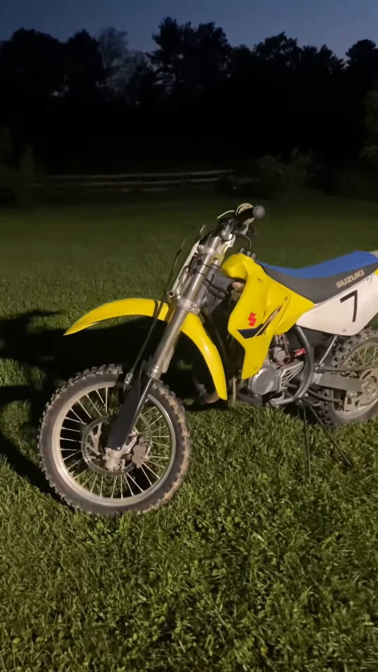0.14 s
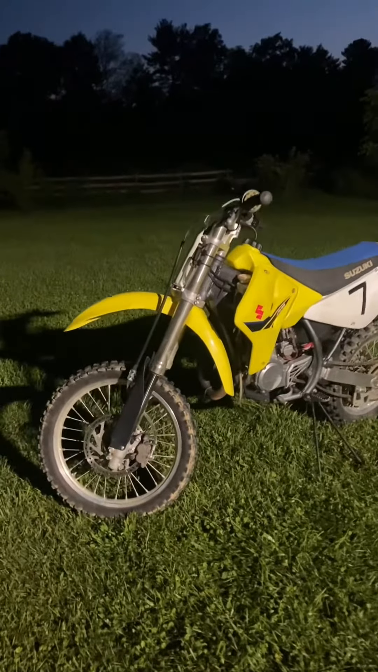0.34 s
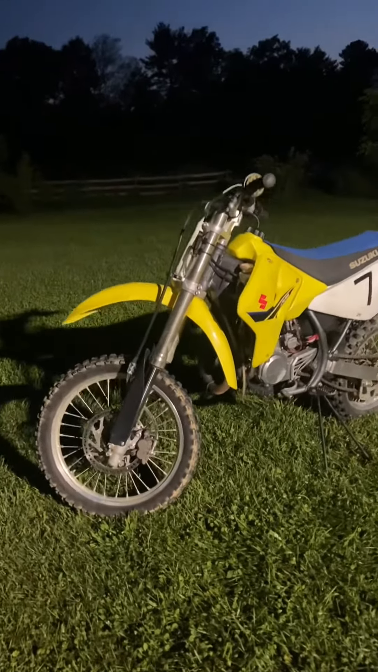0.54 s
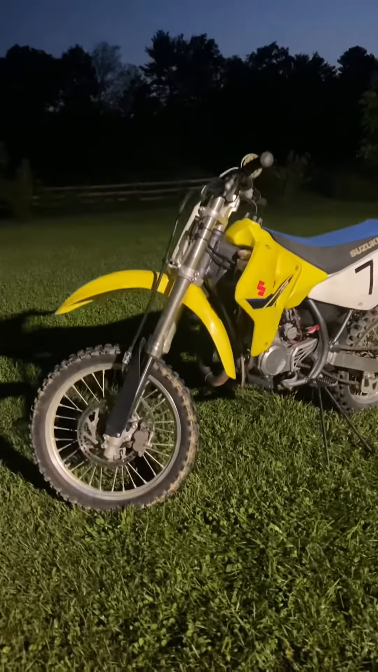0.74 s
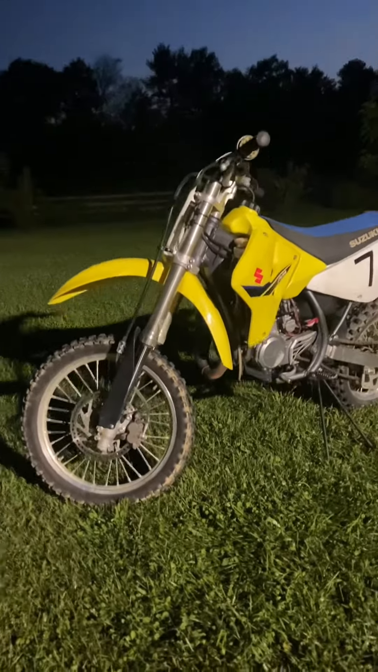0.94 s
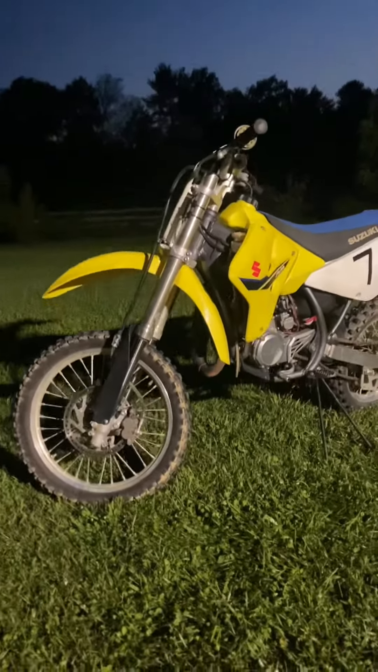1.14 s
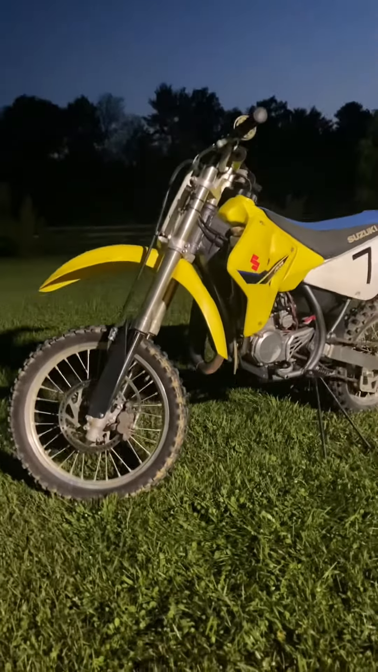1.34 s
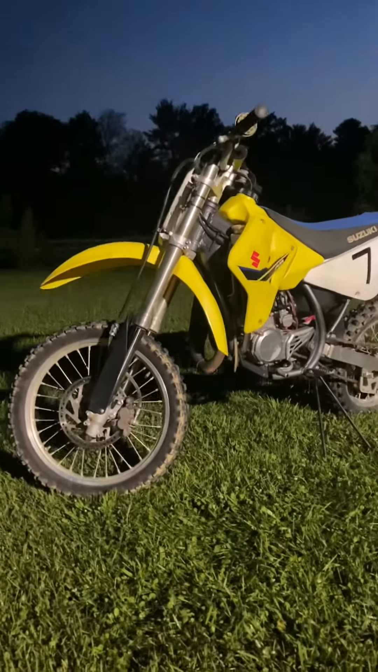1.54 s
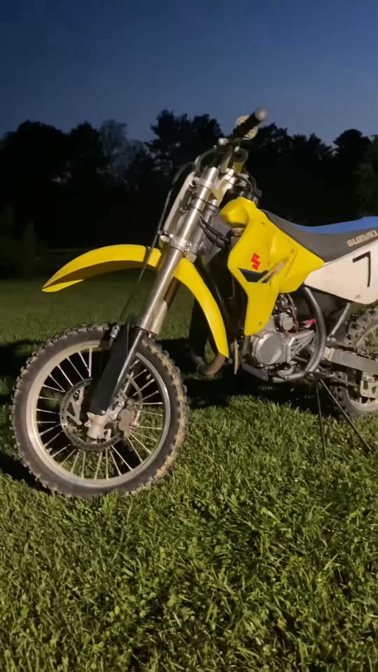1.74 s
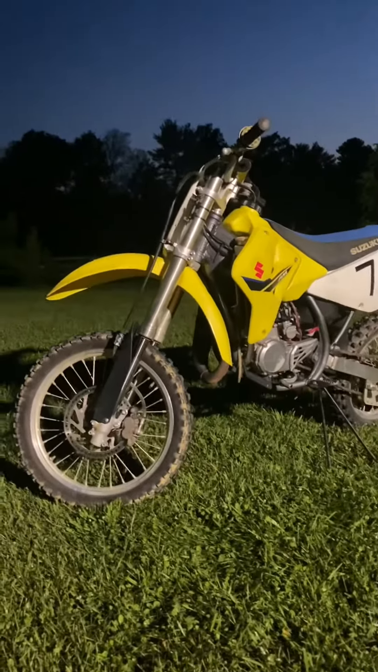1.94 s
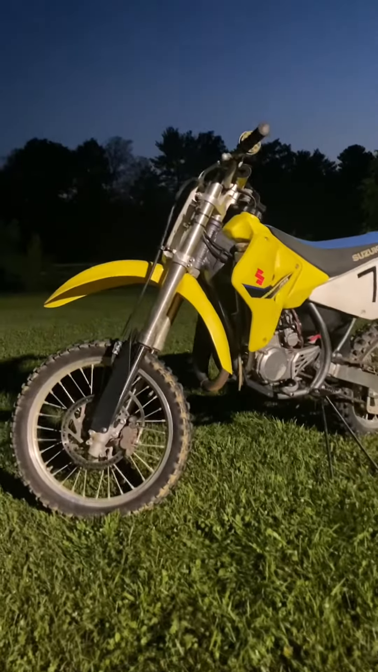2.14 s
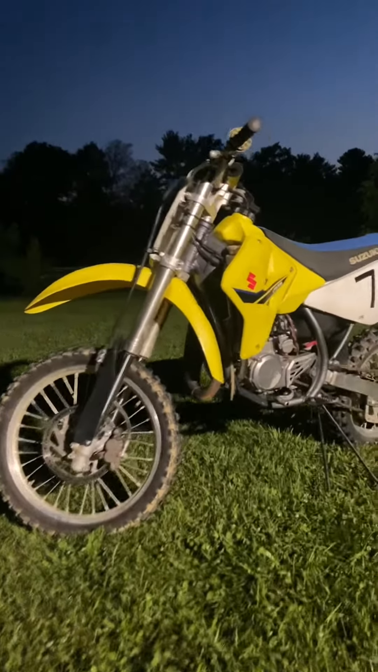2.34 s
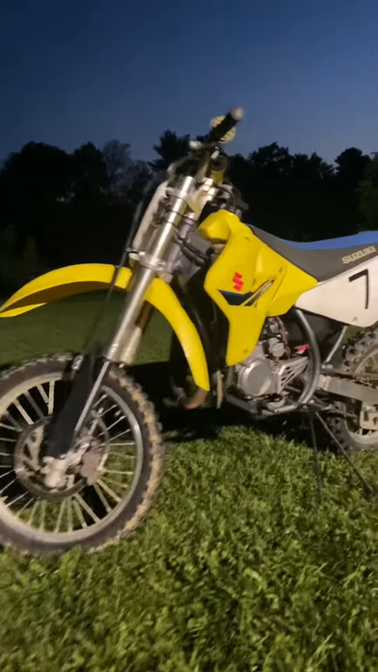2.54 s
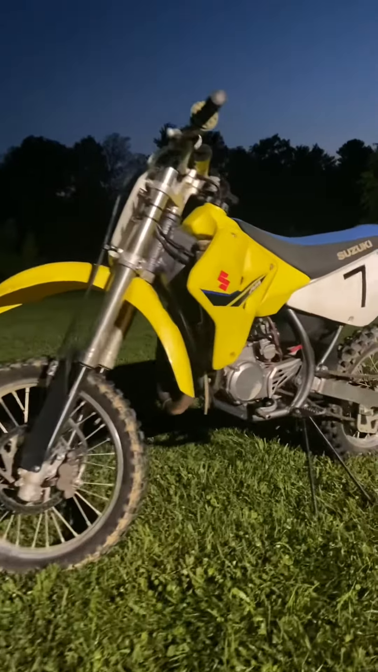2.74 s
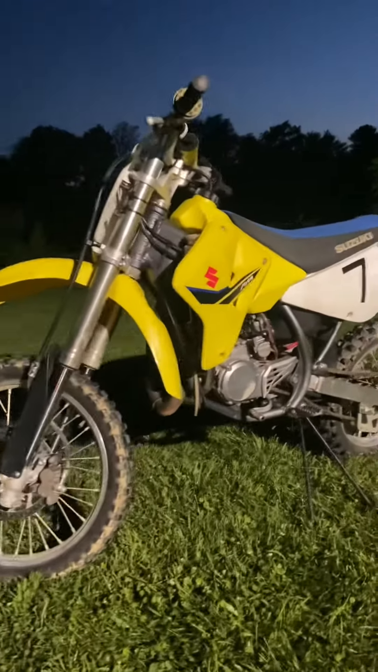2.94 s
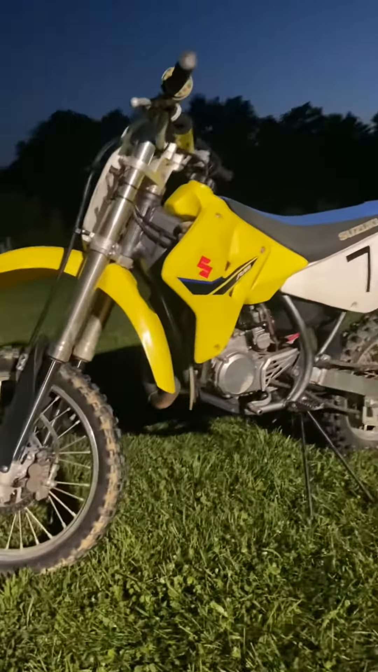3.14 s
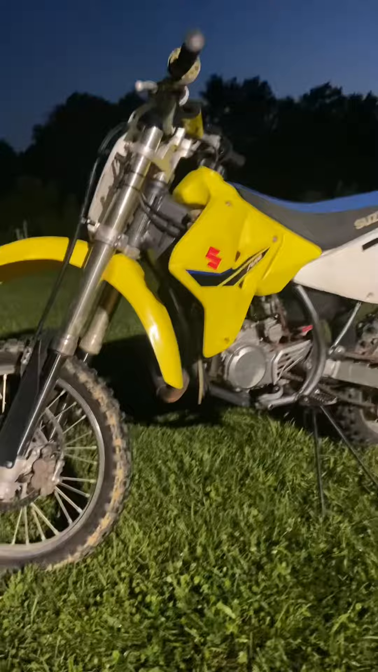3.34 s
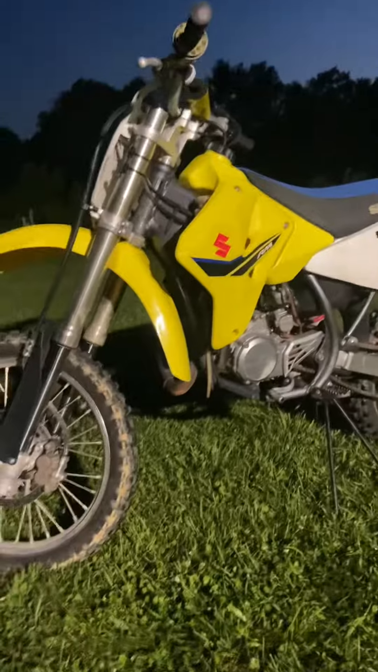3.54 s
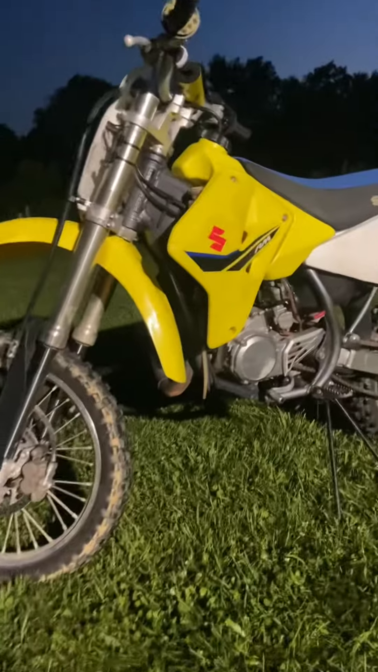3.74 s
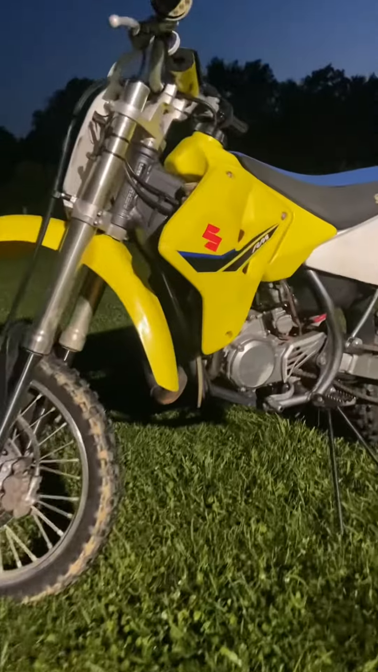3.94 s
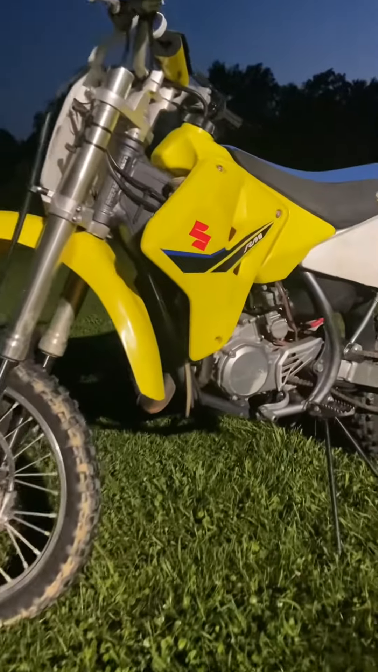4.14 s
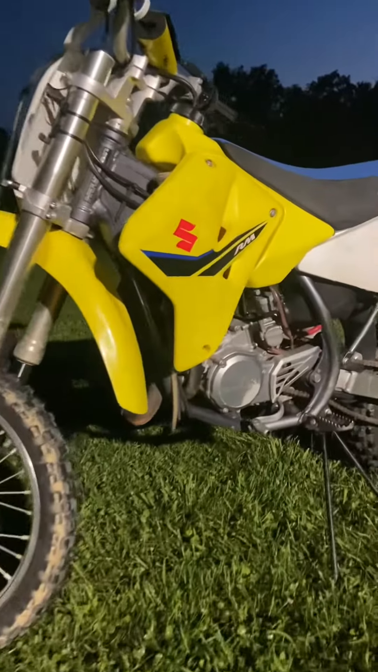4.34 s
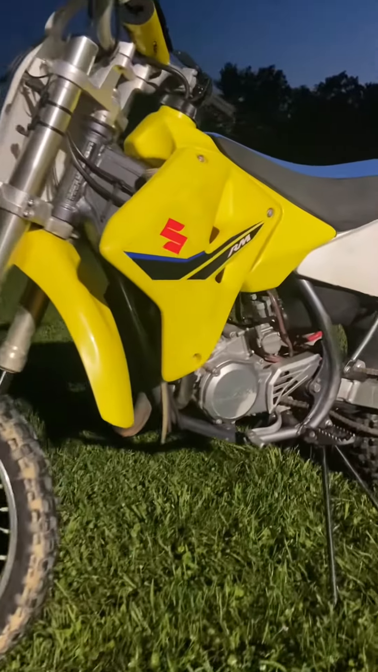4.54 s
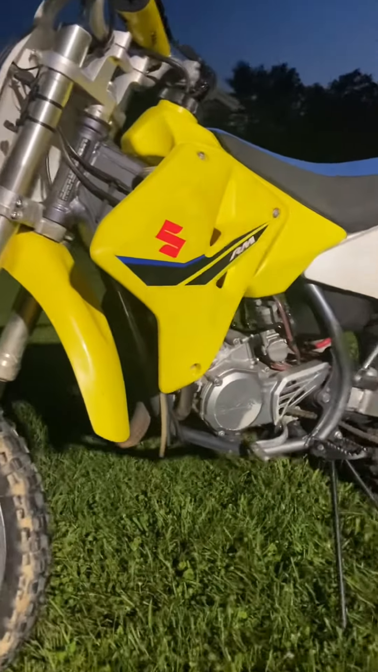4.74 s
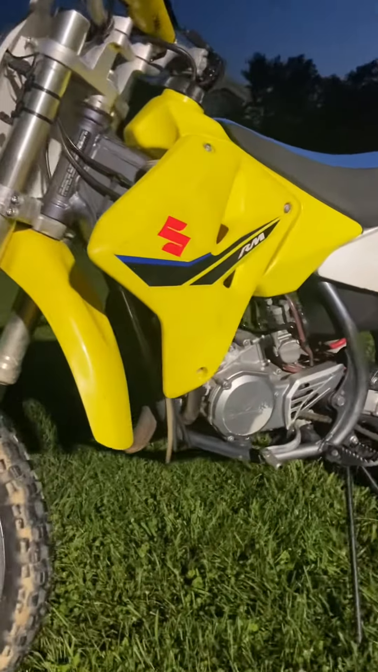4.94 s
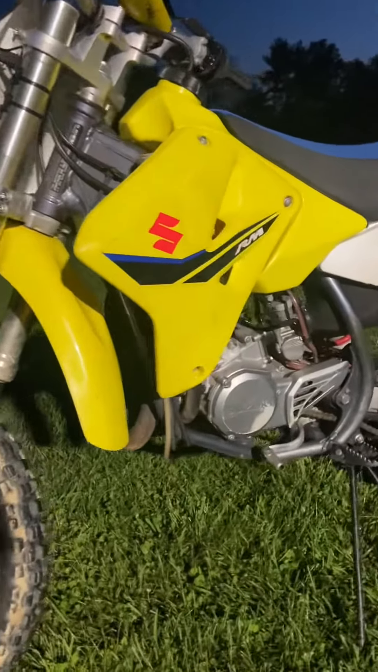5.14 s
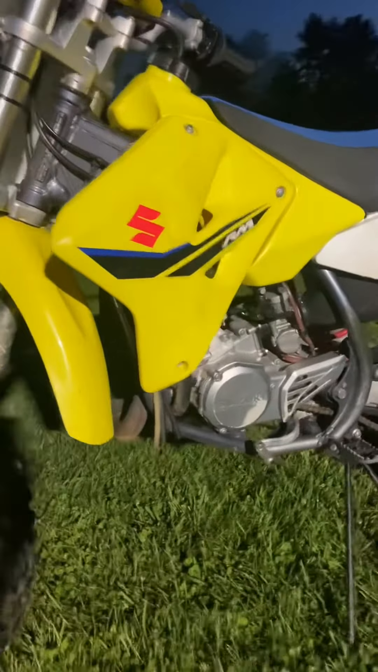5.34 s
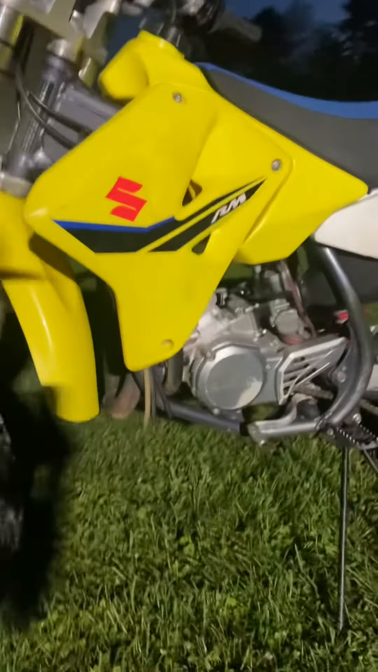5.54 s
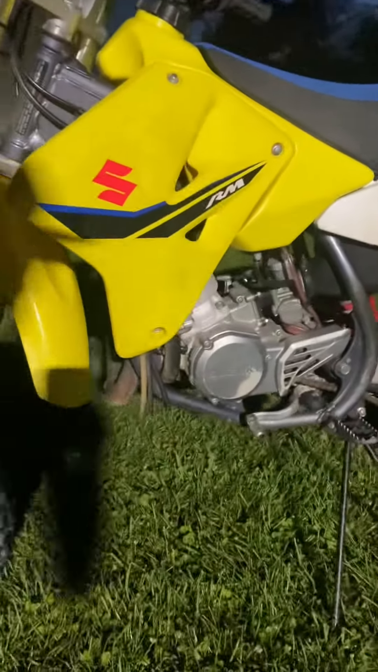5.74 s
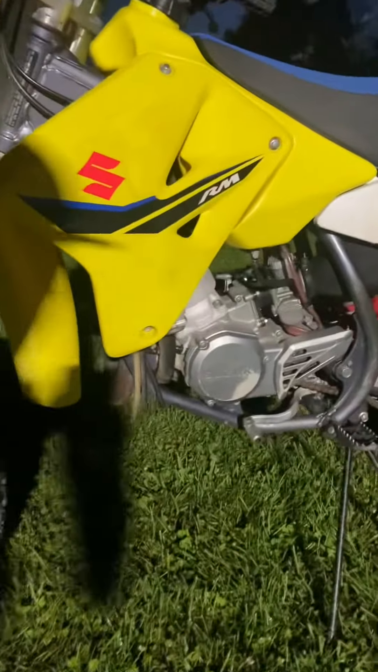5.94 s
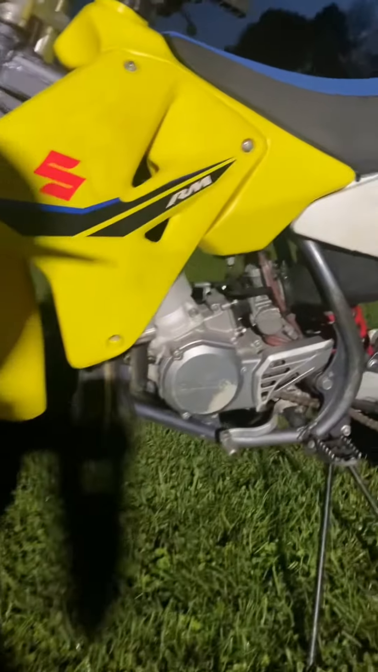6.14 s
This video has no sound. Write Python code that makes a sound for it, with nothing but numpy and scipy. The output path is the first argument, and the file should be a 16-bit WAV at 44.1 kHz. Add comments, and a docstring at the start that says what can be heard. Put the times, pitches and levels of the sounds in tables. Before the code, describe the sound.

A small two-stroke motorcycle engine is already idling on a lawn at 0 s and continues to the end, about 6.3 s. Its steady base is a fast flutter of low thumps, about 33 per second near 120 Hz, each with a puff, tick and hollow knock. Irregular firings stand out, about seven per second at first, then around ten: crack, brief falling whoop, low boom and hissy exhaust. From 0 to 2 s it is somewhat distant and softer. Around 2-3.5 s the pops strengthen and a thin high metallic ringing of the pipe emerges. From 4 s the microphone is nearer; clicks, barks and airy noise grow, with especially strong pops near 5.5 and 6.2 s. Faint low breeze rumble runs beneath, with soft footstep thuds near 1.0 and 3.4 s. Open-air stereo, slight grass reflection, no sustained rev, abrupt end mid-idle.

```python
"""Idling two-stroke engine, approached on foot

A small two-stroke engine idles on a lawn while the listener walks closer, over a low rumble of breeze and steps.
Each crank turn gives a gliding-tone intake thump, a noise puff, clicks and a knock that rings the chamber.
Only some turns fire: these add a crack, a whoop of falling pitch, a boom of rising tones and a long noise hiss,
and they excite resonators that stand for the ringing sheet metal. The sum is spread over two channels."""
import sys
import numpy as np
from scipy import signal
from scipy.fft import rfft, irfft
from scipy.io import wavfile
from scipy.ndimage import uniform_filter1d

SR = 44100
rng = np.random.default_rng(int(sys.argv[2]) if len(sys.argv) > 2 else 0)


def waveform_to_disk(signal):
    """Save audio, clipped to [-1, 1], as 16-bit WAV at the path in sys.argv[1]."""
    frames = np.transpose(np.atleast_2d(signal))
    scaled = np.clip(frames, -1, 1) * 32767
    samples = np.round(scaled).astype(np.int16)
    wavfile.write(sys.argv[1], SR, samples)


N = 276948  # samples, about 6.28 s
EARLY = 15000  # samples before the start from which sound still rings


def amp(db):
    """Decibel law: the amplitude ratio of a level."""
    return 10 ** (np.asarray(db) / 20)


def evened(x):
    """Power normalization: scales to an rms of one."""
    return x / np.sqrt(np.mean(x ** 2) + 1e-20)


def clicks(s, size):
    """Impulse train: one click of the given size at each time."""
    at = np.round(s * SR).astype(int) + EARLY
    out = np.zeros(N + EARLY)
    inside = (at >= 0) & (at < N + EARLY)
    out[at[inside]] = (size * np.ones(len(s)))[inside]
    return out


def strike(s, size, shape):
    """Convolution: plays one shape at each time."""
    return signal.oaconvolve(clicks(s, size), shape)[EARLY:EARLY + N]


def lay(s, shapes):
    """Superposition: plays its own shape at each time."""
    out = np.zeros(N + 2 * EARLY)
    for at, shape in zip(np.round(s * SR).astype(int) + EARLY, shapes):
        out[at:at + len(shape)] += shape
    return out[EARLY:EARLY + N]


def swell(peak_ms, t60):
    """Exponential decay: rises to one at the peak, then falls 60 dB in t60 seconds."""
    t, peak = np.arange(9000) / SR, peak_ms / 1000
    rise = np.sin(np.pi / 2 * np.clip(t / peak, 0, 1)) ** 2
    return np.where(t < peak, rise, amp(-60 * (t - peak) / t60))


def noise_bands(centres):
    """Band filtering: splits pink noise into overlapping bands of equal power."""
    log_hz = np.log(np.fft.rfftfreq(N, 1 / SR) + 1)
    spectrum = rfft(rng.standard_normal(N))
    spectrum *= np.exp(-log_hz / 2) * np.clip((log_hz - np.log(170)) / .5, 0, 1)  # none below 170 Hz
    weights = [np.interp(log_hz, np.log(centres), row) for row in np.eye(len(centres))]
    return [evened(irfft(spectrum * weight, N)) for weight in weights]


def resonate(x, hz, width):
    """Damped resonance: passes one peak of the given bandwidth in hertz."""
    b, a = signal.iirpeak(hz, hz / width, SR)
    return signal.lfilter(b, a, x)


def approach(*db):
    """Path gain: moves evenly through the given levels along the walk."""
    return amp(np.interp(np.arange(N), np.linspace(0, N, len(db)), db))


# Levels on the walk towards the engine. Each row: time in seconds, intake thump level in dB,
# puff level in dB over the thump, second pipe tone in dB over the boom.
WALK = [(0, -30.5, -5, -12), (1.2, -29.3, -5.5, -14), (2.4, -28.5, -5.5, -14), (3.2, -27, -5.5, -12),
        (4, -25.7, -5.5, -9), (4.8, -25, -5, -4.5), (5.4, -25, -4.5, -2), (6.28, -25, -4, -2.5)]


def walk(column):
    """Distance law: one level of the walk, interpolated at every sample."""
    rows = np.array(WALK)
    return np.interp(np.arange(N) / SR, rows[:, 0], rows[:, column])


# Sound of the engine along the walk. Each row: time in seconds, relative metal ring in dB at a full firing,
# boom tail in seconds, low treble gain in dB, gulp pitch in Hz before its glide and shifts.
FACING = [(0, -45, 0.016, 2, 120), (.85, -40, 0.015, -2, 113), (1, -39, 0.015, 2, 120),
          (1.9, -30, 0.019, 0.5, 122.6), (2.501, -25.5, 0.015, 1, 130.6), (3.4, -26.5, 0.011, 1.5, 125.3),
          (4.202, -38, 0.011, 4, 122), (4.9, -34, 0.013, 5, 124.4), (5.6, -35, 0.0072, 2.8, 117.5),
          (6.28, -37.5, 0.0086, 6, 122)]


def facing(s, order):
    """Directivity: one column of the engine's changing sound, at the given times."""
    rows = np.array(FACING)
    return np.interp(s, rows[:, 0], rows[:, order])


# Turns that fire, and a few that only give a sharp click. Each row: time the exhaust port opens in seconds,
# then the relative levels in dB of hiss, boom, mid-band bark and crack.
FIRINGS = [(-0.006, -41.5, -25.5, -32, -37.5), (0.0837, -43, -23.5, -38, -36.5),
           (0.2305, -42.5, -25.5, -35.0, -48), (0.3792, -36.0, -23.5, -35, -38),
           (0.5247, -35.5, -25, -29, -46), (0.6679, -38.5, -24, -33, -42), (0.8158, -36, -22.5, -29, -30.5),
           (0.9595, -38, -23.5, -35, -45), (1.0504, -43, -25.5, -32.5, -44),
           (1.1431, -38.5, -21.5, -33, -35.0), (1.233, -47, -33, -37, -39),
           (1.3252, -41.0, -22.5, -32, -34), (1.4127, -43, -23.5, -45, -37),
           (1.5016, -42.5, -25.5, -43, -35.5), (1.593, -45.5, -27, -43, -31), (1.681, -46, -26, -49, -42),
           (1.77, -37.5, -20.5, -42, -27.5), (1.9134, -41.0, -22, -31, -36.0),
           (2.0006, -50, -33.0, -36, -36), (2.063, -49, -32.0, -43, -37),
           (2.1553, -41.5, -23, -33.5, -28.5), (2.2753, -42.0, -23, -46, -31.5),
           (2.363, -55, -58, -37, -35), (2.4262, -38.0, -19.5, -31.0, -33.5),
           (2.5465, -39.5, -22, -30, -29), (2.663, -34.5, -20, -26.5, -35), (2.7783, -47, -41, -34, -34.5),
           (2.8425, -38.0, -23.5, -29.5, -33), (2.965, -36.5, -20, -29, -30),
           (3.084, -36.5, -22, -28.5, -41), (3.175, -43, -28, -28, -28.5), (3.2668, -36.5, -22.5, -30, -34),
           (3.3862, -44, -48, -33, -25.5), (3.4554, -40, -22, -31.5, -26.5), (3.544, -51, -37, -30, -35.0),
           (3.6097, -39.5, -27, -28.5, -30.5), (3.671, -56, -57, -35, -29), (3.7, -49, -36, -32, -37),
           (3.761, -47, -57, -37, -31), (3.792, -43, -26, -27, -40), (3.8824, -36.5, -21.5, -28.5, -26),
           (4.0012, -40, -24.5, -31.0, -28.5), (4.1184, -34.0, -20.5, -30.5, -27),
           (4.2369, -34.5, -20, -26.5, -30.5), (4.35, -46, -32, -37, -25), (4.41, -36.5, -22, -30, -22),
           (4.4989, -36.0, -25.5, -26.5, -34), (4.5905, -35.0, -24.0, -29, -22),
           (4.709, -39, -24, -27, -24.5), (4.827, -40, -26.0, -28.0, -27), (4.885, -59, -56, -44, -23.5),
           (4.9171, -37, -23, -27.5, -30), (5.036, -36.5, -21.5, -33, -23.5),
           (5.1553, -37.5, -25, -26, -30.5), (5.2463, -38.5, -23, -22, -28),
           (5.3342, -35, -20.5, -26.5, -43), (5.4236, -44, -44, -34, -31.5),
           (5.5173, -32, -18.5, -29.5, -28), (5.6612, -33.5, -19.5, -26, -23),
           (5.7771, -36.5, -22, -27.0, -24.5), (5.8642, -42, -32, -27, -28),
           (5.9254, -40, -22.5, -26.5, -45), (6.0119, -41, -21.5, -27, -45), (6.069, -43, -47.0, -31, -29),
           (6.1287, -42.5, -23, -31, -32), (6.1866, -48, -38.0, -30, -29),
           (6.218, -38.5, -18.5, -27.5, -35)]
FULL_BOOM_DB, RING_PER_BOOM = -26, 0.72  # boom of a full firing; dB of metal ring per dB of boom


def firings():
    """Excitation levels: time, then hiss, boom, metal ring, bark and crack of each row in relative dB."""
    s, hiss_db, boom_db, bark_db, crack_db = np.transpose(FIRINGS)
    ring_db = facing(s, order=1) + RING_PER_BOOM * (boom_db - FULL_BOOM_DB)
    return s, hiss_db, boom_db, ring_db, bark_db, crack_db


TURNS_PER_S = 33.4  # nominal; whole turns are fitted between the rows


def crank(slowing=0.0906):
    """Angular momentum: each row kicks the crank, which slows until the next; gives port opening times."""
    fired = np.array(FIRINGS)[:, 0]
    times = [fired[0] - np.arange(8, 0, -1) / TURNS_PER_S]
    for a, b in zip(fired, fired[1:]):
        count = round((b - a) * TURNS_PER_S)
        u = np.arange(count) / count
        times.append(a + (b - a) * (u - slowing * u * (1 - u)))
    times.append(fired[-1] + np.arange(8) / TURNS_PER_S)
    return np.concatenate(times)


# Heavier steps. Each row: time in seconds, gain in dB on the low noise.
THUDS = [(1.03, -44), (3.43, -36)]
THUD_S = 0.033  # half-length of a step, to 1/e
RUMBLE_DB, LUMPY_DB, LUMPS_HZ = -63.5, -2, 13  # mean level, rms swing, fastest swing
OWN_SHARE = 0.22  # noise of each channel alone, relative to the shared noise


def rumble():
    """Modulated low-band noise: a lumpy rumble of breeze and steps, a little different in each channel."""
    both, left, right, slow = rng.standard_normal((4, N))
    air = both + OWN_SHARE * np.array([left, right])
    low = signal.sosfilt(signal.butter(3, [31, 70], "bandpass", fs=SR, output="sos"), air)
    lumps = evened(signal.sosfilt(signal.butter(2, LUMPS_HZ, fs=SR, output="sos"), slow))
    t = np.arange(N) / SR
    thuds = sum(amp(db) * np.exp(-((t - s) / THUD_S) ** 2) for s, db in THUDS)
    return (amp(RUMBLE_DB + LUMPY_DB * lumps) + thuds) * evened(low)


# Echo off the lawn. Each row: time in seconds, echo delay in milliseconds, echo share of the direct amplitude.
GROUND = [(0, 1.3, 0.079), (1, 1.27, 0.13), (2, 1.14, 0.45), (2.999, 1.38, 0.15), (4.2, 1.4, 0.14),
          (5.2, 2.13, 0.19), (6.28, 2, 0.11)]


def lawn(x, dull_hz=2200):
    """Ground reflection: adds a dull echo off the grass, later close by than from afar."""
    s, ms, share = np.transpose(GROUND)
    n = np.arange(N)
    dull = signal.sosfiltfilt(signal.butter(1, dull_hz, fs=SR, output="sos"), x)
    delayed = np.interp(n - np.interp(n / SR, s, ms) * SR / 1000, n, dull)
    return x + np.interp(n / SR, s, share) * delayed


# Tones that the chamber swallows. Each row: frequency in Hz, width in Hz,
# share of amplitude lost from afar, midway and close by.
HOLLOWS = [(661, 40, 0.12, 0.085, 0.55), (837, 36, 0.74, 0.85, 0.17), (1035, 94, 0.068, 0.046, 0.32),
           (1430, 35, 0.24, 0.22, 0.27), (2074, 97, .3, 0.18, 0.43), (2320, 81, 0.17, 0.19, 0.54)]


def hollowed(x):
    """Antiresonance: subtracts part of the tones that the chamber swallows."""
    for hz, width, *share in HOLLOWS:
        lost = np.interp(np.arange(N), np.linspace(0, N, len(share)), share)
        x = x - np.clip(lost, 0, .9) * resonate(x, hz, width)
    return x


# Modes of the pipe walls. Each row: frequency in Hz, width in Hz,
# relative level in dB from afar, midway and close by.
METAL = [(4305, 45, -10, -9, -4), (4815, 40, -8, -10, -3), (4915, 40, -12, -11, -8), (5132, 30, -2, 0, -4),
         (5212, 32, 0, -2, -3), (5390, 30, -1, -1, -2), (5450, 25, -9, -5, -6), (5562, 40, -7, -4, -6),
         (5786, 40, -13, -11, -8), (5940, 40, -12, -10, -10), (6045, 45, -7, -7, -8)]


def metal(turns, ring_db=6.0, idle_db=-21):
    """Forced plate modes: gas shakes the pipe walls, hard after a firing, lightly each turn, never twice alike."""
    s, _, _, fired_db, *_ = firings()
    out = np.zeros(N)
    for hz, width, *db in METAL:
        hard = amp(fired_db + ring_db + 3.4 * rng.standard_normal(len(s)))
        shake = strike(s, hard, swell(8.6, 0.28))
        shake += strike(turns, amp(idle_db), swell(0.4, 0.16)) * amp(walk(1))
        blow = strike(s + .004, hard * amp(23), [1.])
        out += approach(*db) * resonate(rng.standard_normal(N) * shake + blow, hz, width)
    return out / 2


def ticks(turns, tick_db=-9, t60=0.01, snap_db=19, uneven_db=2.0):
    """Impact noise: the piston rings click past the port edge, a sharp snap and a short scrape per stroke."""
    s, *_, crack_db = firings()
    near = amp(walk(1) + walk(2))
    each = amp(tick_db + uneven_db * rng.standard_normal(len(turns)))
    cracks = amp(crack_db)
    idle_scrape = near * strike(turns - .002, each, swell(0.21, t60))
    fired_scrape = strike(s - .001, cracks, swell(0.53, t60))
    snap = near * strike(turns - .0015, each, [1.]) + strike(s - .001, cracks, [1.])
    band = signal.butter(2, [900, 4600], "bandpass", fs=SR, output="sos")
    grain = evened(signal.sosfilt(band, rng.standard_normal(N)))
    return np.hypot(idle_scrape, fired_scrape) * grain + amp(snap_db) * signal.sosfilt(band, snap)


# Modes of the air in the expansion chamber, also heard in gas(). Each row: frequency in Hz, width in Hz,
# relative level in dB from afar, midway and close by.
PIPE = [(481, 66, -25, -27, -3), (535, 44, -1.5, -3.5, -3.5), (610, 40, -1, -11.5, -4.5),
        (700, 35, -15, -3, -14), (800, 49, -1, -7, -5), (920, 40, -23, -17.5, 0), (1019, 51, -15, 3, -15),
        (1110, 44, -9, -6, -4), (1352, 25, -30, -25, -21), (1531, 50, -6, -7.5, -6),
        (1736, 32, -7, -24, -7), (1951, 33, -10, -12, -17), (2108, 57, 3.5, -5.5, -5.5),
        (2380, 39, -30, -35, -24), (2710, 50, -30, -7.5, -21), (3040, 37, -39, -23, -14.5),
        (3690, 330, -0.5, -2, -9.5)]


def knock(turns, knock_db=-0.5, fired_db=5.0, uneven_db=3.0):
    """Impulse response: the opening port rings the chamber's air alike each turn, harder after a firing."""
    s, *_, crack_db = firings()
    t = np.arange(3000) / SR
    each = amp(knock_db + uneven_db * rng.standard_normal(len(turns)))
    snaps = amp(walk(1) + walk(2)) * strike(turns, each, [1.])
    snaps += strike(s, amp(crack_db + fired_db), [1.])
    out = np.zeros(N)
    for hz, width, *db in PIPE:
        envelope = np.exp(-np.pi * width * t) * (1 - np.exp(-t / 0.0048))
        ring = np.sin(2 * np.pi * hz * t) * envelope
        out += approach(*db) * signal.oaconvolve(snaps, ring)[:N]
    return out


HOT_LATE_S, HOT_SHARP, HOT_DB = .0022, 0.1, 2.0  # most that a gulp is late, sharp (share) and loud after a firing
PITCH_SPREAD, GULP_JITTER_S = 0.015, .0005  # random pitch share and timing of each gulp
CHOKE_FROM_DB, CHOKE_SPAN_DB = -38, 5.5  # boom level where choking starts; range up to full choking


def intake(turns, choked_db=-9, rise_s=0.0112, tail_s=0.0112, fall=14, uneven_db=1.0):
    """Cavity resonance: the air box answers each gulp with a few sagging cycles, just before the port opens."""
    t = np.arange(-1100, 1500) / SR
    shape = np.exp(-abs(t / np.where(t < 0, rise_s, tail_s)) ** 3)
    luck = rng.standard_normal((len(turns), 3))
    s, _, boom_db, *_ = np.transpose(FIRINGS)
    strong = s[boom_db > CHOKE_FROM_DB]
    # share of the wait for the next strong firing still to come
    hot = -np.interp(turns, strong, np.arange(len(strong))) % 1
    size_db = uneven_db * luck[:, 0] + HOT_DB * hot
    # burnt gas pushes back on the next gulp
    after = np.searchsorted(turns, s + 1 / TURNS_PER_S / 2)
    size_db[after] += choked_db * np.clip((boom_db - CHOKE_FROM_DB) / CHOKE_SPAN_DB, 0, 1)
    at = turns - .0045 + HOT_LATE_S * hot + GULP_JITTER_S * luck[:, 1]
    hz = facing(turns, order=4) * (1 + HOT_SHARP * hot + PITCH_SPREAD * luck[:, 2])
    cycles = np.cos(2 * np.pi * hz[:, None] * t * (1 - fall * t))
    thumps = amp(size_db)[:, None] * shape * cycles
    return amp(walk(1)) * evened(lay(at + t[0], thumps))


# Gas leaving the port on any turn. Each row: noise band centre in Hz, milliseconds to the peak,
# t60 in seconds, level in dB, steady level in dB; both relative to the puff level of the walk.
PUFF = [(291, 7.9, 0.13, -8, -12.5), (394, 19.3, 0.013, -12, -17), (680, 11, 0.06, -10, -13.5),
        (873, 4, 0.032, -12.5, -17), (1440, 6.2, 0.059, -6.5, -17.5), (3770, 3.3, 0.041, -15, -29),
        (7600, 6.5, 0.0051, -13, -20.5), (11600, 3.4, 0.034, -33, -28), (16000, 5, 0.069, -38, -44)]
# Gas leaving after a firing, one row per puff band. Each row: nominal frequency in Hz (the puff's band is used),
# milliseconds to the peak, t60 in seconds, level in dB over the bark below 1200 Hz and over the hiss above.
BLAST = [(290, 29.4, 0.012, -3.5), (420, 23.7, 0.022, -6.5), (650, 3.9, 0.018, -32), (1000, 4.6, 0.014, -8),
         (1700, 0.78, 0.19, -1.5), (3400, 4.5, 0.13, -5.5), (6500, 13.6, 0.14, 4), (10500, 16.2, 0.084, -1),
         (15000, 12, 0.12, -9.5)]


def gas(turns, uneven_db=2.0, grit_db=0.6):
    """Jet turbulence: noise, small on every turn and large after a firing, coloured by the pipe's modes."""
    s, hiss_db, _, _, bark_db, _ = firings()
    near = amp(walk(1) + walk(2))
    low_treble = amp(facing(np.arange(N) / SR, order=3))
    bands = noise_bands([row[0] for row in PUFF])
    out = np.zeros(N)
    for noise, (hz, peak_ms, t60, db, steady_db), blast in zip(bands, PUFF, BLAST):
        _, blast_ms, blast_t60, blast_db = blast
        size = amp(db + uneven_db * rng.standard_normal(len(turns)))
        puff = near * (strike(turns - .005, size, swell(peak_ms, t60)) + amp(steady_db))
        source_db = bark_db if hz < 1200 else hiss_db
        fired = strike(s - .003, amp(source_db + blast_db), swell(blast_ms, blast_t60))
        # the jet sputters, averaged over 2 ms
        grit = amp(grit_db * evened(uniform_filter1d(rng.standard_normal(N), 90)))
        turned = low_treble if 3000 < hz < 5000 else 1
        out += noise * grit * turned * np.hypot(puff, fired)
    return out + sum(approach(*db) * resonate(out, hz, width) for hz, width, *db in PIPE)


# The whoop peaks later as the pipe's tail comes near. Each row: time in seconds,
# peak in seconds after the port opens.
WHOOP_PEAK = [(0, 0.0045), (3, 0.0048), (4.5, 0.013), (6.28, 0.014)]
WHOOP_END_HZ, WHOOP_DROP_HZ, WHOOP_DROP_S = 505, 340, .012  # final pitch, height above it at first, time constant
WHOOP_TAIL_S, WHOOP_SPREAD = .02, .04  # decay time to 1/e; random pitch share


def whoop(whoop_db=2):
    """Travelling pressure wave: a firing's wave sweeps down in pitch through the cones and rings on."""
    s, *_, bark_db, _ = firings()
    t = np.arange(3500) / SR
    sweep_hz = WHOOP_END_HZ + WHOOP_DROP_HZ * np.exp(-t / WHOOP_DROP_S)
    sweep_hz = sweep_hz * (1 + WHOOP_SPREAD * rng.standard_normal((len(s), 1)))
    peak = np.interp(s, *np.transpose(WHOOP_PEAK))[:, None]
    envelope = np.where(t < peak, t / peak, np.exp(-((t - peak) / WHOOP_TAIL_S) ** 2))
    tone = np.sin(2 * np.pi * np.cumsum(sweep_hz, axis=1) / SR)
    return lay(s, amp(bark_db + whoop_db)[:, None] * tone * envelope)


BOOM_DELAY_S, BOOM_SPREAD = .0228, .045  # low tone's phase zero after the port opens; random pitch share


def boom(boom_db=4.0, second_hz=400, second_s=.016, second_long_s=0.0043,
         low_hz=180, climb=20, second_climb=12.0, rise_s=0.009, lead_s=.003):
    """Chamber resonance: after a firing the chamber booms in two tones of rising pitch."""
    s, _, fired_db, *_ = firings()
    t = np.arange(3500) / SR
    size = amp(fired_db + boom_db)[:, None]
    pitch = 1 + BOOM_SPREAD * rng.standard_normal((len(s), 2))
    u = t - BOOM_DELAY_S
    from_peak = u + lead_s
    tail_s = facing(s, order=2)[:, None]
    shape = size * np.exp(-(from_peak / np.where(from_peak < 0, rise_s, tail_s)) ** 2)
    low = lay(s, -shape * np.cos(2 * np.pi * low_hz * pitch[:, :1] * u * (1 + climb * u)))
    v = t - second_s
    second_shape = size * np.exp(-(v / second_long_s) ** 2)
    second_tone = np.cos(2 * np.pi * second_hz * pitch[:, 1:] * v * (1 + second_climb * v))
    return low + amp(walk(3)) * lay(s, second_shape * second_tone)


def scene():
    """Superposition: sums the engine's sources, some with the lawn echo, and the rumble."""
    turns = crank()
    chamber = hollowed(gas(turns) + knock(turns) + ticks(turns))
    engine = intake(turns) + boom() + lawn(chamber + whoop()) + metal(turns)
    return engine + rumble()


# Left and right channels. Each row: frequency in Hz, left over right in dB, likeness from 0 to 1.
# The balance fades out and the likeness gives way to a phase rule from 6000 to 6800 Hz.
STEREO = [(150, 0.1, 0.97), (410, 1.5, 1), (856, 4.5, 0.86), (1720, 2, 0.96), (2420, -3, 0.67),
          (3020, -2, 0.39), (4200, -3, 0.48), (5380, 2, 1), (6800, -1, 0.25)]
# Phase lag of the right channel, in steps of half waves. Each row: frequency in Hz, lag in half waves.
TRAIL = [(2000, 0), (2900, .3), (4800, .05), (5700, .3), (6600, .95), (7600, 1), (8300, 1.15), (9800, 2),
         (11300, 2), (12700, 2.95), (14200, 3), (14900, 3.2), (15600, 4)]
EDGE_HZ = 15800  # upper edge of the treble


def record(dry):
    """Stereo width: left and right differ by band in balance, phase and likeness, partly through random phase."""
    # the deepest bass is thinned
    thinned = signal.sosfilt(signal.butter(2, 38, "highpass", fs=SR, output="sos"), dry)
    hz, _, (left, right) = signal.stft(thinned, SR, nperseg=512, noverlap=384)
    f, balance_db, likeness = np.transpose(STEREO)
    trail = np.pi * np.interp(hz, *np.transpose(TRAIL))
    high = np.clip((hz - 6000) / 800, 0, 1)
    lean = amp(np.interp(hz, f, balance_db) * (1 - high) / 2)[:, None]
    alike = np.interp(hz, f, likeness) * (1 - high) + high * (1 - 0.75 * np.sin(trail) ** 2)
    alike = np.where(hz < 250, .996, np.clip(alike, 0, .997))[:, None]
    # frames of random phase add in power only, hence the factor of two
    random_phase = 2 * np.exp(2j * np.pi * rng.random(right.shape))
    right = right * (alike * np.exp(-1j * trail)[:, None] + np.sqrt(1 - alike ** 2) * random_phase)
    channels = np.array([left * lean, right / lean])
    both = signal.istft(channels, SR, nperseg=512, noverlap=384)[1][:, :N]
    edge = signal.firwin(511, EDGE_HZ, window=("kaiser", 9), fs=SR)
    return signal.oaconvolve(both, edge[None], "same")


dry = scene()
out = record(dry)
waveform_to_disk(out)
```